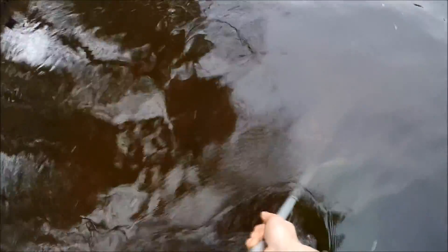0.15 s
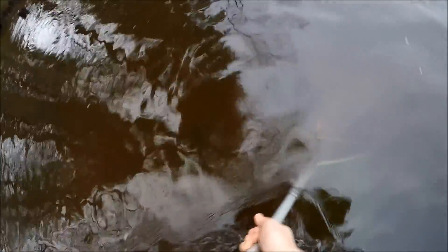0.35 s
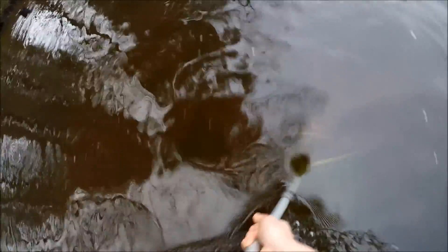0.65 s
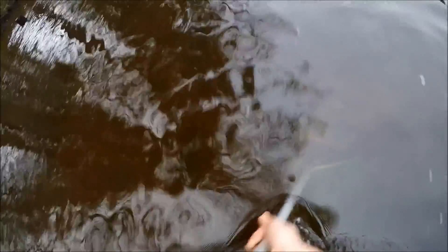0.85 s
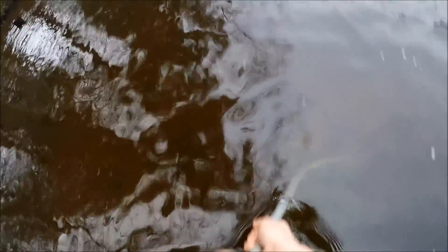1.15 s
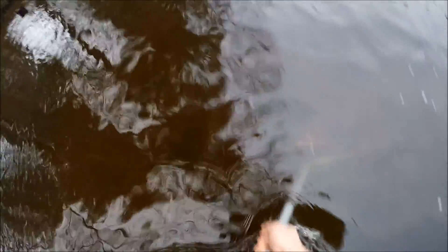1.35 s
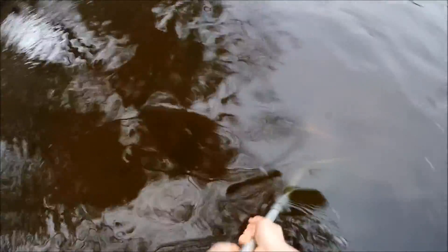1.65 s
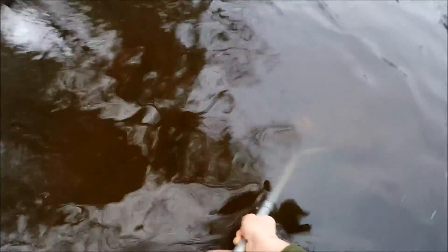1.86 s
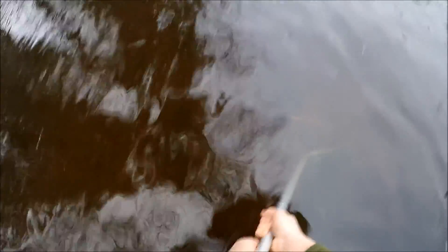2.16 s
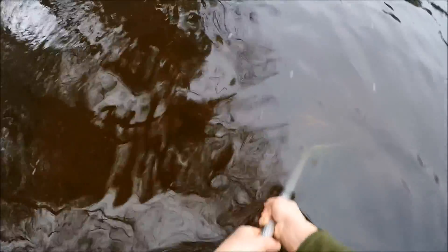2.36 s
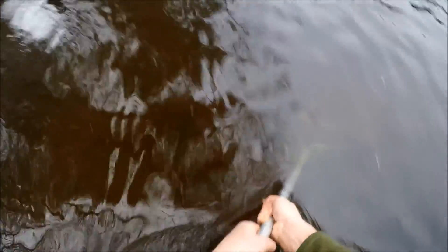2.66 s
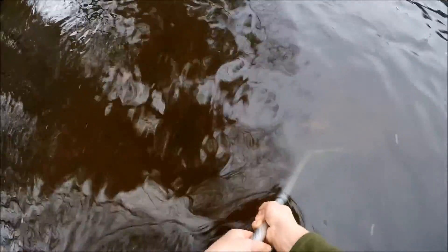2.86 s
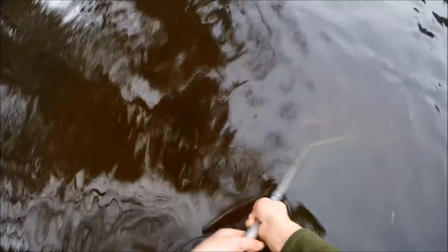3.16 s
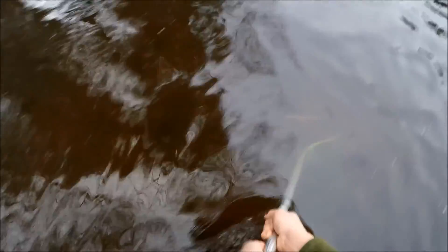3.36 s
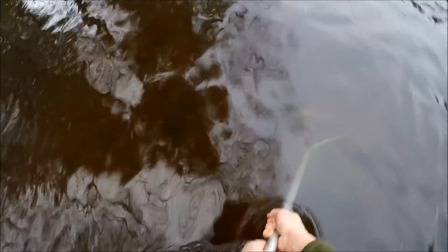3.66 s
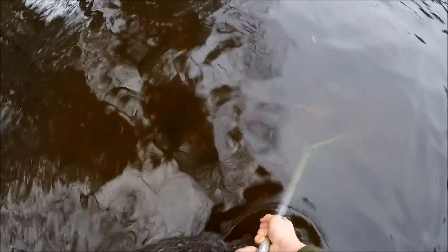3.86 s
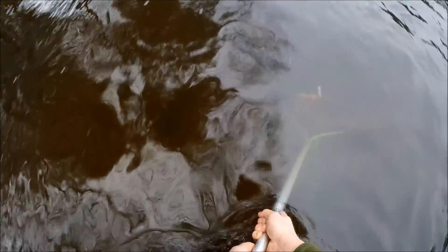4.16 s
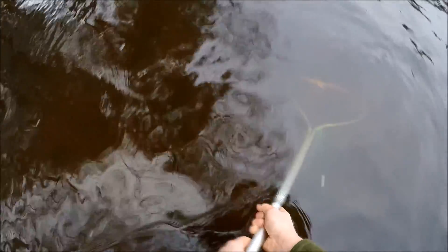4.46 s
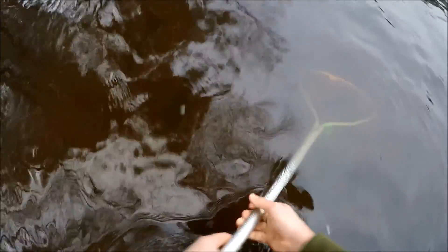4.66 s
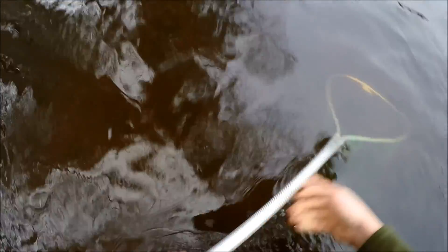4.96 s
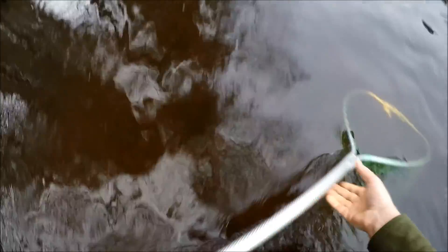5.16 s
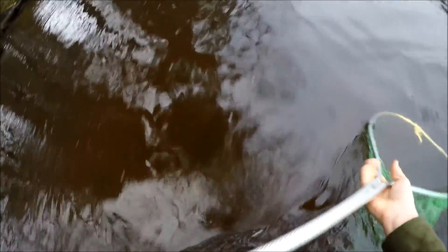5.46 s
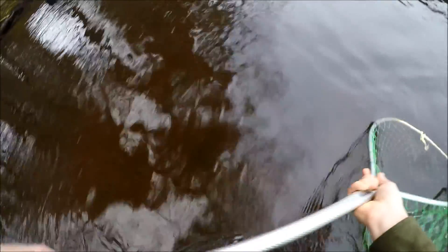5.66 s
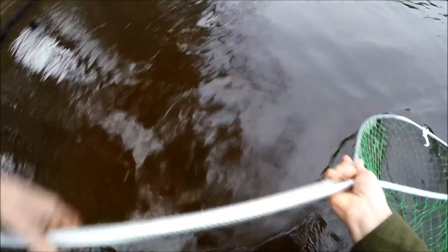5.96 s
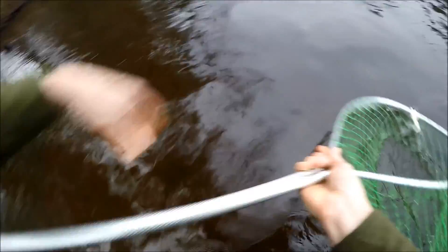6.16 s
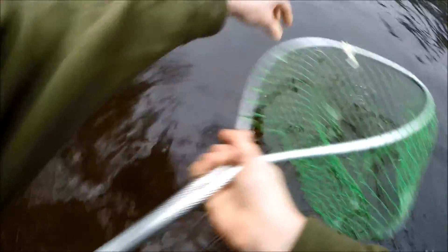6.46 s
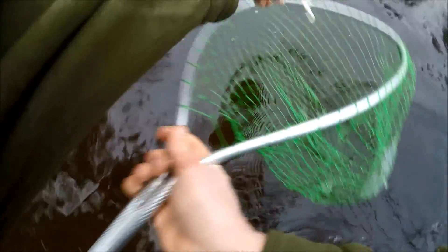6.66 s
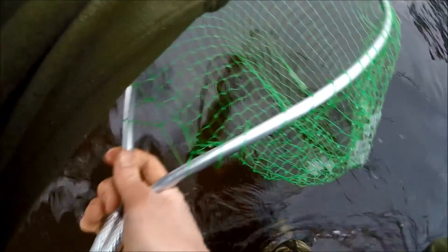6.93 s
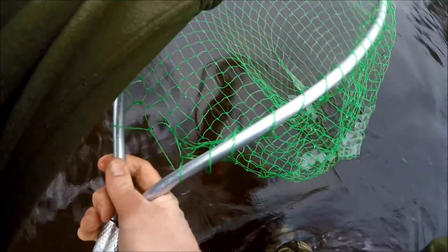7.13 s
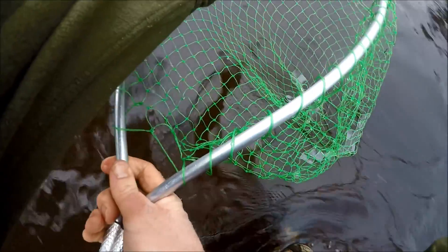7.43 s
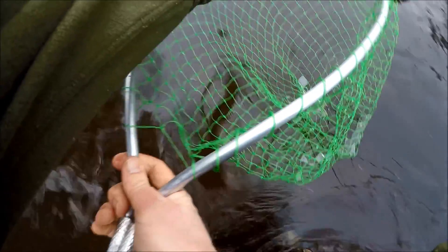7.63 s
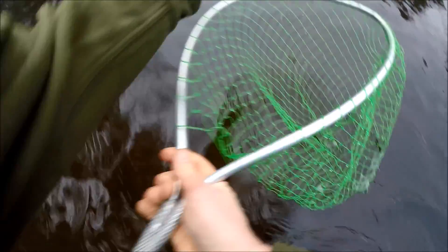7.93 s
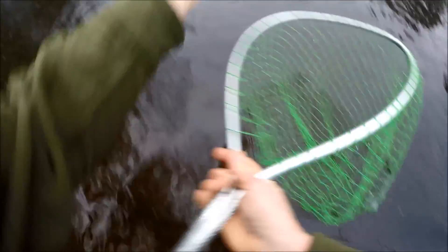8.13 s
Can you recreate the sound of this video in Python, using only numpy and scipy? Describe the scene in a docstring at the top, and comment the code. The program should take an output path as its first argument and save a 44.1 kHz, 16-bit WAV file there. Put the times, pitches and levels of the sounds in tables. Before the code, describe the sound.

Jacket cloth rubs and snaps against a chest-worn microphone, with hollow bumps and low rumble as a landing net is handled by a faint river.

```python
"""Landing net at a quiet river

An angler draws a net out of the water, heard from a camera microphone in a housing worn on the chest.
Right at the housing, jacket cloth rubs, judders and snaps, coloured by its hollow resonances; handle
and arms bump it and ring the mount as the hands work along the pole. The moving body rumbles and
small drips tick. Behind lie the faint wash of the river and one far bird."""
import sys
import numpy as np
from scipy import signal
from scipy.fft import rfft, irfft, next_fast_len
from scipy.io import wavfile
from scipy.ndimage import uniform_filter1d

SR = 44100
rng = np.random.default_rng(int(sys.argv[2]) if len(sys.argv) > 2 else 0)


def wav_out(sig):
    """Save sig, one row per channel (or a flat mono array), as 16-bit PCM at SR to the path in sys.argv[1]."""
    wavfile.write(sys.argv[1], SR, np.round(np.clip(np.atleast_2d(sig).T, -1, 1) * 32767).astype(np.int16))


N = 365677
TIME = np.arange(N) / SR
STEPS = TIME[::64]  # coarse time grid for the arm movements
FREQ = np.fft.rfftfreq(N, 1 / SR)

# the river and the steady hiss under it (frequency [Hz], relative level [dB])
RIVER_SPECTRUM = [(20, -3.5), (45, -11.5), (90, -31), (200, -26), (450, -35.5), (700, -37), (1200, -33),
                  (1700, -35), (3500, -37), (5500, -41), (8200, -43), (11500, -44), (14500, -43.5)]
# whistles of a far bird
# (start [s], length [s], first pitch [Hz], middle pitch [Hz], last pitch [Hz], level [dB])
BIRD_NOTES = [(4.03, 0.13, 3310, 3290, 3430, -65), (4.39, .125, 3330, 3470, 3443, -65),
              (4.562, 0.097, 3420, 3370, 3460, -58)]
# body rumble, strong while the net is held in the current and lifted (time [s], level [dB])
BODY_SWAY = [(0.0, -59), (0.23, -35), (0.42, -42.5), (0.6, -37), (1.1, -41), (1.5, -35.5), (1.68, -41.5),
             (2.12, -34), (2.5, -40), (3.4, -43), (3.9, -47), (4.4, -52.5), (4.95, -51.5), (5.8, -48.5),
             (5.98, -43.5), (6.8, -42.5), (7.48, -52), (8.29, -39.5)]
# small drips and ticks (time [s], relative level [dB], pitch [Hz])
DRIP_PINGS = [(0.275, -47, 6500), (.398, -38.5, 3970), (.574, -41, 4760), (0.939, -39.5, 5240),
              (2.028, -41, 2190), (2.508, -44.5, 5440), (2.584, -39.5, 2450), (2.836, -43, 4440),
              (2.863, -44, 5330), (2.971, -45.5, 6560), (3.271, -50, 8350), (3.751, -41.5, 4100),
              (3.756, -50, 7700), (4.458, -40, 1580), (5.212, -30, 3160), (5.958, -45, 5450),
              (6.14, -47, 7900), (7.133, -37, 5050)]
# broad colour of cloth heard from inside the housing (frequency [Hz], relative gain [dB])
CLOTH_SPECTRUM = [(60, -22.5), (180, 11.5), (450, -3.5), (900, 0.5), (1250, -5.5), (2100, -2.5),
                  (3150, 2.5), (3650, -7), (4500, -12), (6600, -14.5), (7200, -18.5), (8700, -29.5),
                  (11500, -35.5), (14500, -36)]
# air resonances of the housing around the microphone (frequency [Hz], width [Hz], full gain [dB])
AIR_MODES = [(570, 60, 2.0), (750, 180, 5.3), (1100, 110, 4.9), (1420, 230, 8.4), (1700, 250, 7.9),
             (2540, 270, 4.5), (2950, 380, -2.3), (3230, 210, -2.4), (3980, 190, 10.1), (4220, 200, 7.9),
             (4950, 250, 8.7), (5430, 170, 5.9), (5890, 140, 5.9), (6140, 240, 6.7), (6590, 360, 5.1),
             (9680, 680, 11.1), (10630, 310, 6.6)]
# resonances of the housing wall (frequency [Hz], width [Hz], relative gain [dB])
WALL_MODES = [(974, 330, 1), (1656, 140, 1.5), (2550, 350, 0.5), (4020, 240, -9)]
# ringing of mount and housing when bumped (frequency [Hz], gain [dB], time to fall 60 dB [s])
MOUNT_MODES = [(56.3, -6.5, 0.12), (119.7, 11, 0.035), (186, -7, 0.04), (300, 6.5, 0.041),
               (578, -6.5, 0.047), (738, 4.5, 0.028), (940, -22, 0.015), (1103, -5, 0.038),
               (1410, -24, 0.0092), (1870, -7, 0.015)]
# the air gap between sleeve and housing dips in pitch as the arm passes (time [s], pitch [Hz])
GAP_PITCH = [(6.2, 1700), (6.38, 1700), (6.48, 1410), (6.56, 1600), (6.68, 1730)]
# the sleeve brushes lightly right on the housing wall (peak time [s], length [s], level [dB])
WALL_BRUSHES = [(7.1, .14, -57), (7.375, 0.067, -52.5), (7.46, 0.09, -48.5), (7.565, 0.056, -49.5),
                (7.629, .09, -46)]
# a hand slides along the pole and rings the mount (peak time [s], length [s], level [dB])
MOUNT_SKIDS = [(5.11, 0.052, -40.5), (5.189, .07, -44.5), (6.363, 0.046, -35)]
# the arm presses cloth hard against the housing (peak time [s], length [s], judder [dB])
ARM_DRAGS = [(4.695, 0.16, -47.5), (5.15, 0.17, -36.5), (5.934, 0.085, -40), (6.39, 0.081, -26.5),
             (6.595, 0.16, -26.5), (6.678, .1, -29.5), (7.785, 0.074, -40.5), (7.882, 0.085, -37),
             (8.115, 0.082, -39), (8.245, 0.56, -32.5)]
# short tugs of the sleeve as the arms steer the pole
# (peak time [s], length [s], rub [dB], brightness [dB], judder [dB])
SLEEVE_TUGS = [(0.041, 0.13, -40.5, -4.5, -42.5), (0.158, 0.081, -49, 0.5, -54),
               (0.238, 0.082, -59, 4, -50), (.315, 0.12, -50.5, -4, -51), (0.513, 0.096, -52, 1, -64),
               (0.618, 0.079, -52.5, -3, -48), (0.772, 0.093, -44, 2, -44.5), (0.885, 0.14, -60, -2, -59),
               (1.02, 0.14, -46.5, 0, -44.5), (1.143, 0.23, -55, -5, -48), (1.246, 0.19, -58.5, -8, -48.5),
               (1.404, 0.061, -52.5, -7, -40), (1.527, 0.15, -54, 4, -42), (1.613, 0.077, -50.5, -14, -50),
               (1.72, 0.29, -49.5, -2, -53), (1.904, .09, -55, -1, -41), (2.163, 0.1, -48, 0.5, -37),
               (2.301, 0.068, -52.5, 2, -44), (2.44, 0.36, -59, -3, -62), (2.585, 0.26, -60.5, -3, -47.5),
               (2.747, 0.11, -57, -6, -37), (2.846, 0.2, -63.5, 3, -46), (3.064, 0.085, -47, -7.5, -41),
               (3.126, 0.068, -49.5, -6, -55), (3.388, 0.27, -58, -0.5, -49), (3.455, 0.04, -75, 1, -48),
               (3.56, 0.059, -51, 0, -50), (3.705, 0.21, -65, 0, -49.5), (3.849, 0.069, -52.5, -4, -52),
               (4, .18, -60.5, -4, -57.5), (4.227, 0.26, -69.5, 1, -58.5)]
# long sweeps of the sleeve across the chest as a hand reaches along the pole
# (full from [s], full until [s], attack [s], release [s],
#  rub [dB], brightness [dB], rasp of the ribbed weave [dB], judder [dB])
SLEEVE_SWEEPS = [(4.652, 4.855, 0.12, 0.16, -50.5, -0.5, 3.5, -53.5),
                 (5.05, 5.328, 0.18, 0.18, -52, 0.5, 3, -56),
                 (6.033, 6.2, 0.17, 0.072, -54, -4, 0.5, -49.5), (6.38, 6.598, .15, .17, -39.5, -4, 2, -43),
                 (6.775, 6.89, 0.055, 0.091, -46, -3, 2, -48),
                 (7.127, 7.697, 0.093, 0.063, -58.5, -3.5, 1, -54.5),
                 (8.11, 8.286, 0.29, .15, -46.5, -3, 2.5, -43)]
# folds of cloth snap or scuff close to the microphone
# (time [s], relative level [dB], brightness [dB], decay [s], pitch of the fold [Hz])
FOLD_SNAPS = [(0.014, -29, 8, 0.0023, 2400), (0.048, -48.5, 20.5, 0.0052, 6100),
              (0.158, -43, -10, 0.012, 1690), (0.487, -38, -4, 0.0053, 2180),
              (0.75, -29.5, -14, 0.0032, 2520), (0.763, -52, 19, 0.006, 5500),
              (0.786, -33, 10, 0.0032, 4400), (0.802, -34.5, -4, 0.0052, 2790),
              (0.992, -56, 19, 0.0051, 6600), (1.024, -23, -14, 0.0035, 1960),
              (1.125, -26, -5, 0.0029, 1850), (1.29, -34, -5, 0.0018, 3100), (1.52, -26, 2.5, 0.0019, 3420),
              (1.533, -34, -4, 0.0024, 3000), (1.555, -44, 16, 0.0016, 4110),
              (1.604, -27.5, -6, 0.0037, 1880), (1.628, -31, -10, 0.0023, 1830),
              (1.689, -23.5, 1, 0.0018, 2530), (1.715, -28.5, 1, 0.0023, 1780),
              (1.793, -37.5, 0.5, 0.013, 1650), (1.893, -29.5, -6, 0.0028, 1710),
              (2.08, -41.5, 9, 0.0035, 5500), (2.104, -53.5, 20.5, 0.011, 5270),
              (2.157, -38.5, 0, 0.019, 3100), (2.608, -34.5, -2, 0.0022, 1600),
              (2.739, -34.5, -21, 0.0011, 1300), (3.078, -35.5, -18, 0.0037, 2580),
              (3.383, -38, -13, 0.0022, 1510), (3.549, -48.5, 4.5, 0.037, 3320),
              (6.901, -26, -9, 0.0067, 2720), (8.024, -30, -6, 0.0021, 4060)]
# handle and arms bump the housing
# (time [s], soft thud [dB], hollow body [dB], hard knock [dB], rough upper reach of the contact [Hz])
HOUSING_BUMPS = [(0.079, -26, -40.5, -56, 600), (0.927, -33.5, -40.5, -56, 600),
                 (1.421, -29.5, -40.5, -48, 600), (1.793, -33, -29.5, -21.5, 680),
                 (1.916, -30, -41, -46, 600), (1.959, -35.5, -52, -50, 600), (2.155, -38, -32, -26.5, 850),
                 (2.179, -28, -35, -39, 600), (2.199, -22, -58, -55, 600), (2.252, -29, -47, -40, 600),
                 (2.349, -39, -36.5, -33, 740), (2.358, -29, -51, -40, 764), (2.553, -34, -54, -36.5, 560),
                 (2.741, -15, -36, -21, 1680), (2.861, -32.5, -49, -44, 590), (3.104, -37, -51, -36.5, 835),
                 (3.315, -37, -58, -44, 600), (3.531, -35, -33.5, -28.5, 690), (3.654, -27, -63, -42, 605),
                 (4.936, -21, -46, -35, 587), (4.967, -37, -36, -40, 880), (5.094, -24.5, -56, -30, 910),
                 (5.131, -38, -41, -32, 844), (5.22, -40, -45, -35.5, 805), (5.286, -51, -41, -36, 610),
                 (5.834, -31, -35, -38, 885), (5.927, -27, -34, -32.5, 860), (5.955, -27.5, -56, -36, 845),
                 (5.986, -20.5, -34, -35, 830), (6.011, -40, -43, -38, 590), (6.104, -34.5, -63, -57, 600),
                 (6.155, -30.5, -56, -40, 870), (6.353, -29, -28, -17.5, 735), (6.36, -26.5, -32, -32, 755),
                 (6.368, -24, -36, -36, 795), (6.388, -34, -27, -17, 765), (6.395, -38, -19, -20, 850),
                 (6.544, -40, -23, -18, 850), (6.67, -23, -39, -50, 900), (6.728, -29, -51, -51, 610),
                 (6.905, -27, -44, -37, 895), (7.006, -26.5, -57, -62, 604), (8.183, -26.5, -43, -44, 600)]


def amp(db):
    """Decibels to gain."""
    return 10 ** (np.asarray(db) / 20)


def decibels(gain):
    """Gain to decibels."""
    return 20 * np.log10(gain)


def unit(x):
    """Scales to rms 1."""
    return x / np.sqrt(np.mean(x ** 2) + 1e-20)


def spectrum(points):
    """Joins (frequency [Hz], level [dB]) points on a log-frequency axis."""
    hz, db = np.transpose(points)
    return np.interp(np.log(FREQ + 1), np.log(hz + 1), db)


def follow(rows):
    """A curve's value at every sample."""
    return np.interp(TIME, *np.transpose(rows))


def add(mix, s, sound):
    """Mixes a sound in at time s."""
    part = mix[max(round(s * SR), 0):][:len(sound)]
    part += sound[:len(part)]


def colour(x, db, band_hz, order=8192):
    """Causal filter shaped like db, scaled so that white noise of rms 1 has rms 1 within band_hz."""
    in_band = (FREQ > band_hz[0]) & (FREQ < band_hz[1])
    db = db - 10 * np.log10(np.mean(amp(db) ** 2 * in_band))
    log_gain = np.interp(abs(np.fft.fftfreq(order, 1 / SR)), FREQ, db) * np.log(10) / 20
    taps = np.fft.ifft(np.exp(np.conj(signal.hilbert(log_gain)))).real
    return signal.oaconvolve(x, taps[:order // 2])[:N]


def lift(x, db, lo_hz, hi_hz):
    """Raises or lowers one band by db, which may be a curve."""
    band = signal.sosfiltfilt(signal.butter(2, [lo_hz, hi_hz], "band", fs=SR, output="sos"), x)
    return x + (amp(db) - 1) * band


def wobble(rate_hz):
    """A smooth random curve of rms 1, mostly slower than rate_hz."""
    size = next_fast_len(N)
    hz = np.fft.rfftfreq(size, 1 / SR)
    slow = rfft(rng.standard_normal(size)) / (1 + (hz / rate_hz) ** 4)
    return unit(irfft(slow, size)[:N])


def slips(per_s, spread_db, smooth):
    """Friction: tiny stick-slip clicks of uneven size over a share of smooth hiss."""
    size = amp(spread_db * np.minimum(rng.exponential(1, N), 4)) * rng.choice([-1, 1], N)
    clicks = size * (rng.random(N) < per_s / SR)
    return unit(unit(clicks) + smooth * rng.standard_normal(N))


def together(db):
    """Gain at every sample of several movements at once, each a row of dB over STEPS."""
    power = (amp(np.maximum(db, -150)) ** 2).sum(0)
    return np.interp(TIME, STEPS, np.sqrt(power))


def swells(peak, length, db, roundness=0.96):
    """Gain of short movements: each rises to a point and is 10 dB down at both ends of its length."""
    away = 2 * abs(STEPS - peak[:, None]) / length[:, None]
    return together(db[:, None] - 10 * away ** roundness)


def holds(start, end, attack, release, db, roundness=1.33):
    """Gain of long movements: attack, hold and release; each flank moves 10 dB in its time."""
    before = (start[:, None] - STEPS) / attack[:, None]
    after = (STEPS - end[:, None]) / release[:, None]
    away = np.maximum(before, after).clip(min=0)
    return together(db[:, None] - 10 * away ** roundness)


def stir(db, slope, usual_sway_db=-42):
    """Gain of the jacket stirring with the body: db at the usual sway, plus slope dB per dB of sway."""
    return amp(db + slope * (follow(BODY_SWAY) - usual_sway_db))


def river(level_db=-67.5):
    """A faint, even wash of moving water behind everything."""
    wash = slips(per_s=830, spread_db=0.5, smooth=1.9) * amp(0.14 * wobble(rate_hz=6.1))
    return amp(level_db) * colour(wash, spectrum(RIVER_SPECTRUM), band_hz=(400, 15000))


def bird():
    """Thin gliding whistles from far off on the bank."""
    out = np.zeros(N)
    for s, length, *pitches, db in BIRD_NOTES:
        progress = np.linspace(0, 1, int(length * SR))
        hz = np.interp(progress, [0, 0.5, 1], pitches)
        whistle = np.sin(2 * np.pi * np.cumsum(hz) / SR)
        add(out, s, amp(db) * signal.windows.tukey(len(hz), 0.5) * whistle)
    return out


def sway():
    """Deep, lumpy rumble of the moving body and the air on the microphone."""
    shape = amp(spectrum([(5, -58), (16, 14.5), (26, 1.5), (45, -3), (70, -9), (130, -44), (500, -65.5)]))
    shape /= np.sqrt(np.mean(shape ** 2 * (FREQ > 18) * (FREQ < 70)))
    rumble = irfft(rfft(rng.standard_normal(N)) * shape, N)
    return rumble * amp(follow(BODY_SWAY))


def drips(rise_s=0.0014, decay_s=0.0018, splash=0.65):
    """A drip is a very short ping with a little spray around its pitch."""
    t, out = TIME[:SR // 40], np.zeros(N)
    fade = (1 - np.exp(-(t / rise_s) ** 2)) * np.exp(-t / decay_s)
    for s, db, hz in DRIP_PINGS:
        band = signal.butter(4, [hz * 0.83, hz * 1.2], "band", fs=SR, output="sos")
        spray = unit(signal.sosfilt(band, rng.standard_normal(len(t))))
        ping = np.sin(2 * np.pi * hz * t) + splash * spray
        add(out, s, amp(db + 2.5) * ping * fade)
    return out


def housing(x, depth):
    """Cloth noise reaches the microphone through the housing; depth scales its air resonances."""
    peaks_db = sum(db * np.exp(-2 * ((FREQ - hz) / width) ** 2) for hz, width, db in AIR_MODES)
    return colour(x, spectrum(CLOTH_SPECTRUM) + depth * peaks_db, band_hz=(1300, 4000))


def brush():
    """Light strokes right on the housing wall sound hollow: only its resonances come through."""
    ring = sum(amp(db) / (1 + ((FREQ - hz) / width) ** 2) ** 1.5 for hz, width, db in WALL_MODES)
    strokes = slips(per_s=1500, spread_db=4.5, smooth=0.6) * swells(*np.transpose(WALL_BRUSHES))
    return colour(strokes, decibels(ring + 1e-4), band_hz=(850, 2750))


def skid():
    """The hand catches and slips as it slides along the pole, ringing the middle resonances of the mount."""
    catches = slips(per_s=140, spread_db=3, smooth=0.43) * swells(*np.transpose(MOUNT_SKIDS))
    ring_db = spectrum([(100, -9), (310, 2), (440, -14), (560, -17), (630, -6), (715, -0.5),
                        (830, -15), (980, -21), (2000, -35), (6000, -77)])
    return colour(catches, ring_db, band_hz=(450, 1000))


def judder():
    """Cloth catching on the housing shakes the mount at its low resonances."""
    tug, sweep = np.transpose(SLEEVE_TUGS), np.transpose(SLEEVE_SWEEPS)
    pulls = [swells(*tug[:2], db=tug[-1]), holds(*sweep[:4], db=sweep[-1]),
             swells(*np.transpose(ARM_DRAGS)), stir(db=-60.5, slope=1)]
    shake = slips(per_s=320, spread_db=3, smooth=0.37) * np.linalg.norm(pulls, axis=0)
    ring_db = spectrum([(30, -19.5), (75, -4), (115, 1), (148, -2.5), (205, -13.5), (255, -13.5),
                        (295, -10.5), (370, -27.5), (520, -32.5), (720, -20), (1000, -37), (3000, -68)])
    return colour(shake, ring_db, band_hz=(85, 350))


def crinkle(per_s_per_pitch=9, cycles=1.67, spread_db=4):
    """Tiny creases pop, each with its own pitch and a few cycles."""
    t, out = TIME[:400], np.zeros(N)
    for hz in np.geomspace(1300, 6000, 24):
        pop = t * hz * np.exp(-2 * t * hz / cycles) * np.sin(2 * np.pi * hz * t)
        times = TIME[rng.random(N) < per_s_per_pitch / SR]
        sizes = np.minimum(rng.exponential(1, 2000), 3.5)
        for s, size in zip(times, sizes):
            add(out, s, amp(spread_db * size) * pop)
    return unit(out)


def tugs(crinkle_db=-12, stir_bright_db=3):
    """In a tug the weave slips in uneven surges and crinkles; some tugs are duller, some crisper."""
    *when, db, bright_db, _ = np.transpose(SLEEVE_TUGS)
    stirring = stir(db=-67, slope=0.2)
    gain = np.hypot(swells(*when, db), stirring)
    treble_gain = np.hypot(swells(*when, db + bright_db), stirring * amp(stir_bright_db))
    weave = slips(per_s=2600, spread_db=2, smooth=1) * amp(1.67 * wobble(rate_hz=39))
    weave += amp(crinkle_db) * crinkle()
    return gain * lift(weave, decibels(treble_gain / gain), lo_hz=3250, hi_hz=7800)


def air_gap(x, width_hz=90):
    """The air between sleeve and housing rings at a pitch that moves with the arm."""
    turn = np.exp(2j * np.pi * np.cumsum(follow(GAP_PITCH)) / SR)
    pole = np.exp(-np.pi * width_hz / SR)
    return 2 * (turn * signal.lfilter([1 - pole], [1, -pole], x / turn)).real


def sweeps(gap_db=-4, sheen_db=1):
    """In a sweep the weave slides with a high sheen, its ribs rasp, and the gap under the sleeve rings."""
    *when, db, bright_db, rasp_db, _ = np.transpose(SLEEVE_SWEEPS)
    gain = holds(*when, db)
    weave = slips(per_s=6000, spread_db=3.5, smooth=1.1) * amp(1.3 * wobble(rate_hz=53))
    weave += amp(gap_db) * air_gap(weave)
    weave = lift(weave, decibels(holds(*when, db + bright_db) / gain), lo_hz=3320, hi_hz=9200)
    weave = lift(weave, decibels(holds(*when, db + rasp_db) / gain), lo_hz=2380, hi_hz=3180)
    return amp(-0.88) * gain * lift(weave, sheen_db, lo_hz=9500, hi_hz=11200)


def sleeve():
    """Tugs and sweeps of the sleeve, close up and heard through the housing."""
    return housing(tugs() + sweeps(), depth=0.75)


def folds(ring_db=8, ring_width_hz=380, patchy_db=2.5, rise_s=0.00081):
    """A fold lets go: a burst of slips that dies in milliseconds, coloured by its size and shape."""
    t, out = TIME[:4096], np.zeros(N)
    hz = np.fft.rfftfreq(len(t), 1 / SR)
    middle = (hz > 1300) & (hz < 3500)
    for s, db, bright_db, decay_s, fold_hz in FOLD_SNAPS:
        grit, shape = rng.standard_normal((2, len(t)))
        patches = unit(uniform_filter1d(uniform_filter1d(shape, size=70), size=50))[:len(hz)]
        tone_db = ring_db * np.exp(-((hz - fold_hz) / ring_width_hz) ** 2)
        tone_db += patchy_db * patches * np.minimum(hz / 5000, 1)
        fade = (1 - np.exp(-t / rise_s)) * np.exp(-t / decay_s)
        burst = irfft(rfft(grit) * amp(tone_db)) * fade
        # a snap's level is set by its middle range
        burst *= np.linalg.norm(fade) / np.sqrt(np.mean(abs(rfft(burst)[middle]) ** 2))
        add(out, s, amp(db - 1.5) * lift(burst, bright_db, lo_hz=4100, hi_hz=14400))
    return housing(out, depth=0.47)


def bumps(detune=0.03):
    """Each bump rings the mount: soft weight feeds the low modes, hard contact the high ones."""
    t, out = TIME[:SR // 8], np.zeros(N)
    hz, db, t60 = np.transpose(MOUNT_MODES)[:, :, None]
    group = np.digitize(hz, [240, 360])  # thud, body or knock
    # the push builds up over part of a cycle, so slow modes start softly
    contact = 1 - np.exp(-(t / (0.0005 + 0.25 / hz)) ** 2)
    for s, thud_db, body_db, knock_db, reach_hz in HOUSING_BUMPS:
        force_db = np.array([thud_db, body_db - 1, knock_db - 1])[group]
        pitch = hz * (1 + detune * rng.standard_normal(hz.shape))
        modes = amp(db + force_db - 60 * t / t60) * np.sin(2 * np.pi * pitch * t)
        # sleeve and palm pad the contact and cut off the upper modes
        padding = signal.butter(6, reach_hz * 1.1, fs=SR, output="sos")
        add(out, s - 0.001, signal.sosfilt(padding, (contact * modes).sum(0)))
    return out


def scene():
    """One microphone on the chest: cloth and bumps right at it, river and bird behind."""
    close = sleeve() + brush() + folds() + judder() + bumps() + skid()
    return (close + drips() + sway() + river() + bird())[None]


def record(dry):
    """The recorder cuts off the top treble steeply."""
    lowpass = signal.firwin(511, cutoff=15350, window=("kaiser", 9), fs=SR)
    return signal.oaconvolve(dry, lowpass[None], "same")


dry = scene()
out = record(dry)
wav_out(out)
```